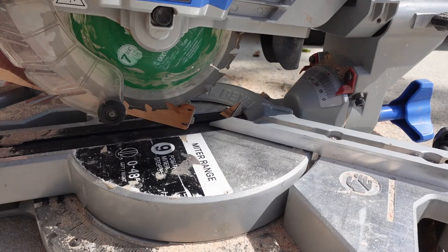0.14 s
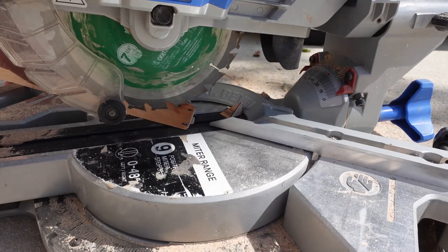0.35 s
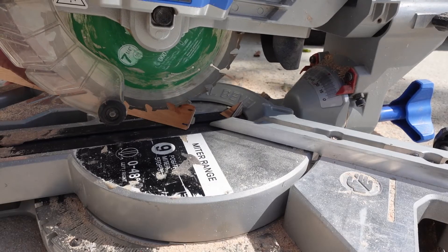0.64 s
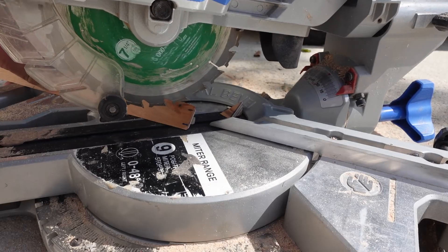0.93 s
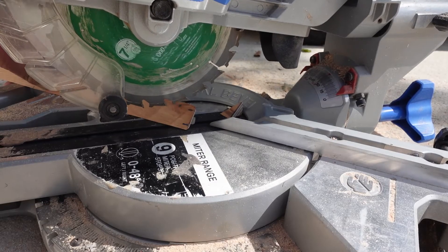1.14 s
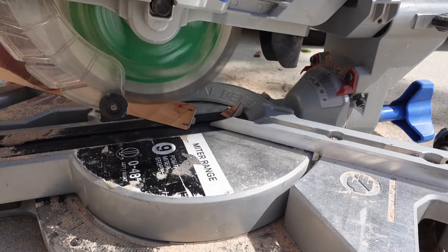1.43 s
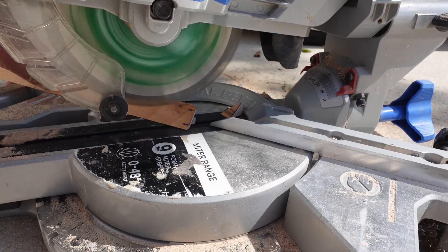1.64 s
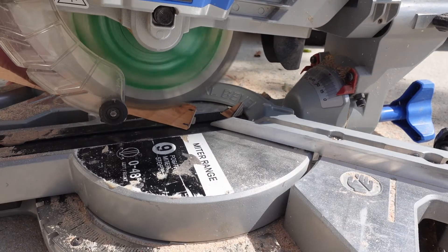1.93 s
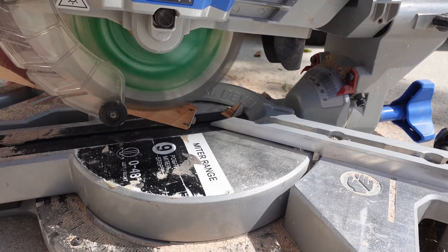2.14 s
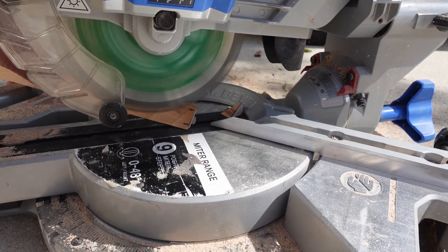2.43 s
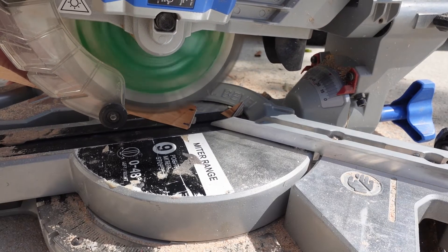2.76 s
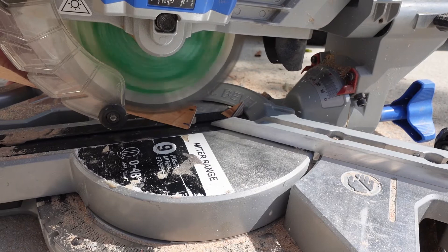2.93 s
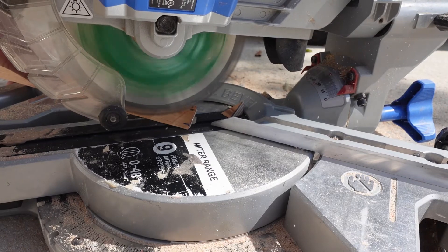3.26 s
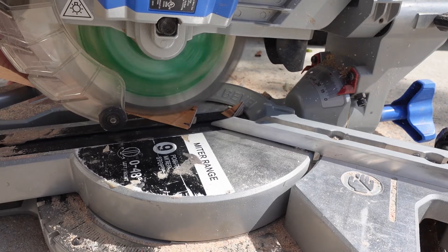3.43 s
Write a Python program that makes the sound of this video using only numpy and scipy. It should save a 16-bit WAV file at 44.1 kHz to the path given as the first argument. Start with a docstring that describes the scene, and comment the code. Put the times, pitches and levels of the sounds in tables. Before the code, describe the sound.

A cordless miter saw clicks on, whines up to speed and runs with a rough, rushing roar

```python
"""A cordless miter saw outdoors, close to a mono microphone.
First a gust buffets the microphone (puffs of deep noise) over a background hiss, a far rushing
and a far idling engine (steady tones). A finger works the trigger: short bursts of filtered noise.
The motor kicks in and whines up to speed (gliding tones, with rushing noise around them). The blade
chuffs as it turns (one puff of noise a turn), then buzzes and rings in the wood (blurred tones)."""
import sys
import numpy as np
from scipy import signal
from scipy.fft import rfft, irfft, next_fast_len
from scipy.io import wavfile
from scipy.ndimage import uniform_filter1d, map_coordinates

SR = 44100
rng = np.random.default_rng(int(sys.argv[2]) if len(sys.argv) > 2 else 0)


def generate_wav(sig):
    """Save sig (samples, or channels by samples) to the path in sys.argv[1] as 16-bit PCM at SR."""
    pcm = np.round(np.clip(np.atleast_2d(sig).T, -1, 1) * 32767).astype(np.int16)
    wavfile.write(sys.argv[1], SR, pcm)


N = 158760
T = np.arange(N) / SR  # time of each sample (s)

# Noise colours, used for their shape only: freq_hz, level_db (per Hz)
BUFFET_COLOUR = [(12, -34), (20, -6), (69, -1.5), (121, 3), (248, -11.5), (281, -12), (315, -16.5),
                 (900, -39.5), (1170, -60), (1980, -120)]  # wind pushing on the microphone
HISS_COLOUR = [(15, -41), (25, -3), (49, -5.5), (137, -13), (228, -18.5), (299, -22), (461, -24),
               (1220, -34), (1590, -32), (2590, -35), (4100, -43), (11400, -49), (15800, -56)]  # background hiss
DISTANT_COLOUR = [(500, -36), (690, 5), (800, -18), (1500, -11), (3600, -15), (4000, -42)]  # a far rushing
BRUSH_COLOUR = [(2650, -21), (4500, -3.5), (5210, -27.5), (5980, -5.5), (10400, -7.5), (15800, -22)]  # chuffs of the blade
RUSHING_COLOUR = [(60, -40), (238, -16.5), (300, -23.5), (397, -9.5), (501, -9.5), (762, -11), (962, -1.5),
                  (1080, -7.5), (1460, -10.5), (1680, -6.5), (1890, -12.5), (2030, -8.5), (2180, -8.5),
                  (2620, -10.5), (3640, -14.5), (4090, -10.5), (5280, -13.5), (5930, -11), (10400, -21.5),
                  (15800, -29)]  # gears, fan and air round the blade

# Gusts on the microphone: time_s, peak_db, fall_s (to about a third)
PUFFS = [(0.066, -39.5, 0.017), (0.126, -22.5, 0.027), (0.189, -24, 0.025), (0.256, -22.5, 0.028),
         (0.331, -40, 0.028), (0.422, -44, 0.0095), (0.491, -69, 0.0094)]
PUFF_RISE = 0.49  # rise time of a gust over its fall time
PUFF_HISS_DB = -29.5  # hiss added for a puff of gain 1; it follows the puff's square root
# Level of the background hiss, which sinks and at the end lifts a little: time_s, level_db
HISS_LEVEL = [(0, -50.5), (.3, -54), (.6, -58), (.9, -59), (1.3, -68.5), (1.5, -75.5), (3.6, -70)]
DISTANT_START_DB, DISTANT_FALL_DB_PER_S = -56, 31
MIC_HISS_DB = -78
# Far engine: multiple of the idle pitch, level_db (relative)
IDLE = [(1, -83), (2, -73), (3, -70.5), (4, -78.5), (5, -81.5), (6, -76.5), (8, -82.5), (14, -79.5)]
IDLE_HZ, IDLE_GAIN_DB = 39.6, 10.0
IDLE_SHARE = 0.64  # share of the hiss's level change, in dB, that is also heard on the engine

# Trigger clicks; the last three are the motor's kick, the gears taking up and a tick as the soft
# start ends: time_s, level_db, hold_s, t60_s, centre_hz, width_hz (of one pass of a doubled filter)
CLICKS = [(0.837, -69, 0.003, 0.033, 1900, 400), (0.878, -61.5, .003, 0.073, 1550, 600),
          (0.904, -47.5, 0.0029, 0.036, 1420, 1190), (0.957, -55.5, 0.002, 0.019, 1590, 1500),
          (1.0463, -30, 0.0029, 0.0063, 3270, 11000), (1.047, -42, 0.0023, 0.021, 450, 604),
          (1.048, -33.5, 0.0015, 0.026, 1900, 2600), (1.3163, -32, 0.0029, 0.012, 3020, 3470),
          (1.34, -36, 0.0042, 0.03, 850, 700), (1.389, -45, 0.003, 0.012, 10000, 9000)]
CLICK_RISE_S = 0.00037
KNOCK_DB, KNOCK_HZ = -19.5, 111  # low push under each click, relative to the click
# The trigger's slide: centre_hz, width_hz, level_db (relative)
CREAK_PEAKS = [(3840, 440, -4), (4640, 210, 0), (6100, 130, 1), (8100, 330, -7), (9100, 400, -12)]
CREAK_S, CREAK_HALF_LENGTH_S, CREAK_DB = .922, 0.016, -56
ECHO_DB, ECHO_T60_S, ECHO_TOP_HZ = -18, 0.11, 5000

# Speed of the saw: time_s, whine_hz
SPEED = [(1.33, 20), (1.42, 1050), (1.5, 2160), (1.55, 2730), (1.6, 3200), (1.65, 3460), (1.7, 3640),
         (1.75, 3770), (1.83, 3900), (1.95, 3980), (2.11, 4012), (2.4, 4038), (2.8, 4038), (3.6, 4026)]
ON_S, ON_FADE_S = 1.3165, 0.0028

# Bite into the wood, a gain on buzz and ring: time_s, bite_db
BITE = [(2.6, -40), (2.78, -0.5), (3.0, 5), (3.3, 6), (3.6, 4.5)]
BUZZ_PER_WHINE = 3 / 140  # Hz of buzz per Hz of whine
# Buzz of the cut: multiple of the buzz pitch, level_db (before the bite)
BUZZ = [(20, -55), (24, -60), (28, -59), (31, -59), (36, -60), (37, -58), (38, -59), (39, -61), (47, -58.5),
        (56, -60)]
# Ringing of the blade: pitch_hz, level_db (before bite or chuff)
BLADE = [(7900, -65), (8312, -62), (8856, -56), (8974, -57), (9200, -55.5), (10120, -65), (10616, -65),
         (11400, -68), (15500, -70)]
BLADE_BLUR_HZ = 260

# Chuffs: time_s, level_db (before the shape of each chuff)
CHUFF_LEVEL = [(1.6, -47), (1.75, -32), (2.3, -33), (2.4, -36.5), (2.6, -31.5), (2.85, -29.5), (3.1, -32.5),
               (3.6, -50)]
CHUFF_S = 2.7  # one strong chuff; the others are placed turn by turn around it
WHINE_PER_TURN = 70  # whine cycles per blade turn
CHUFF_RISE_S, CHUFF_T60_S = 0.0043, 0.053
CHUFF_WEAK_DB = -9.5  # every second turn is weaker
CHUFF_SCATTER_DB, CHUFF_JITTER_S = 1.5, .0015  # random spread of strength and timing
CHUFF_RING_DB = 44.5  # how hard a chuff rings the blade

# Band edges of the roar: edge_hz
BANDS = [0, 1500, 6500, 11000, 20000]
# Roar in those bands: time_s, lows_db, mids_db, treble_db, top_db (before the trim)
ROAR = [(1.33, -44, -53, -68, -67), (1.39, -40.5, -41.5, -62, -69), (1.451, -40, -39.5, -43, -59),
        (1.58, -51.5, -37.5, -40, -45), (1.681, -41, -37, -45, -52.5), (1.85, -39.5, -35.5, -45.5, -55),
        (2.3, -42, -37, -45, -57), (2.648, -41.5, -36.5, -45.5, -60), (2.8, -41, -38.5, -45, -48),
        (3.1, -44, -38, -43, -50), (3.6, -45, -37, -40, -45.5)]
ROAR_TRIM_DB = -2.5
PATCHY_DB, FLUTTER_DB, BAND_FLUTTER_DB = 1.5, .8, 1.13  # random unevenness

# The whine: time_s, whine_db, double_pitch_db, half_pitch_db
WHINE = [(1.41, -76, -58, -59), (1.428, -69, -32, -70), (1.452, -70, -42.5, -70), (1.466, -74, -31.5, -68),
         (1.484, -57, -41, -68), (1.497, -33, -44, -77), (1.515, -37, -44.5, -63), (1.55, -53.5, -46, -45),
         (1.61, -37.5, -54, -75), (1.69, -42, -71, -60), (1.79, -52, -61, -66), (1.9, -45, -79, -47.5),
         (2.1, -55.5, -68, -44), (2.5, -53.5, -74, -40.5), (2.8, -56, -65, -43.5), (3.1, -62.5, -63, -47),
         (3.6, -62, -66, -56)]
# Other shaft tones: multiple of the whine, level_db (before sag and run-up), blur_hz
ORDERS = [(.121, -59, 40), (.25, -54, 30), (.2815, -57, 10), (.418, -57, 50), (0.698, -64, 48),
          (1.458, -58, 60)]
ORDER_SAG_DB = -4  # change per unit of bite gain: the orders sink as the blade bites
ORDER_FULL_HZ = 2300  # whine speed from which the orders sound in full
RUNUP_DB, RUNUP_HZ = 7, 500  # orders are louder while the whine is this far under full speed
# Switching whistle of the soft start: rest_hz, slide (Hz per Hz of whine), level_db, start_s, end_s
WHISTLE = [(5050, .45, -46, 1.332, 1.395), (5050, -.3, -53, 1.332, 1.39), (10100, -.46, -59, 1.332, 1.49),
           (10100, .46, -63, 1.39, 1.53), (15200, -.5, -61, 1.332, 1.385)]
WHISTLE_FADE_S = .01
# The housing's hum: time_s, pitch_hz, level_db
HUM = [(1.58, 960, -53.5), (1.68, 968, -53), (2.2, 978, -40), (2.4, 970, -52.5), (2.6, 982.4, -41.5),
       (3.0, 965, -50.5), (3.6, 970, -54.5)]
# Rattles of the housing at the start: centre_hz, width_hz, level_db (relative)
HOUSING = [(850, 130, -13), (1630, 95, -8), (2270, 190, 4.5), (3420, 170, 0.5), (4000, 23, 0),
           (4470, 59, -3), (4800, 170, -5)]
# Loudness of the rattle: time_s, level_db
RATTLE_LEVEL = [(1.316, -27), (1.35, -42.5), (1.368, -32.5), (1.43, -37), (1.455, -48), (1.49, -70)]

TOP_HZ, EDGE_HZ = 15800, 150  # band limit and width of its edge


def amp(db):
    """dB to gain."""
    return 10 ** (np.asarray(db) / 20)


def unit(x):
    """Scaled to rms (average strength) 1."""
    return x / np.sqrt(np.mean(np.abs(x) ** 2) + 1e-20)


def curves(rows):
    """One value per sample for each column after the time."""
    s, *cols = np.transpose(rows)
    return [np.interp(T, s, c) for c in cols]


def wobble(rate):
    """A smooth random curve through rate random points a second."""
    return map_coordinates(rng.standard_normal(int(N * rate / SR) + 4), [T * rate])


def filtered(x, response):
    """Each frequency of x multiplied by a response, which may be complex."""
    m = next_fast_len(N + SR // 2)  # spare room so the end does not wrap onto the start
    return irfft(rfft(x, m) * response(np.fft.rfftfreq(m, 1 / SR)), m)[..., :N]


def rush(colour):
    """Coloured noise of rms 1 with patches of random gain in time and pitch."""
    z = signal.stft(rng.standard_normal(N), nperseg=512)[2]
    patches = uniform_filter1d(rng.standard_normal(z.shape), size=5, axis=0)
    patches = uniform_filter1d(patches, size=8, axis=1)
    noise = signal.istft(z * amp(PATCHY_DB * unit(patches)), nperseg=512)[1][:N]
    f, db = np.transpose(colour)

    def response(hz):
        return amp(np.interp(np.log(hz + 1), np.log(f + 1), db, left=-80, right=-80))
    return unit(filtered(noise, response))


def body(peaks):
    """The response of a set of resonances, as in a struck or shaken part."""
    def response(f):
        return sum((-1) ** k * amp(db) * 1j * f * w / (c * c - f * f + 1j * f * w)
                   for k, (c, w, db) in enumerate(peaks))
    return response


def tone(hz, blur_hz, steady):
    """A tone of rms 1 on a pitch curve: part clean, part narrow noise."""
    fuzz = (wobble(blur_hz) + 1j * wobble(blur_hz)) / np.sqrt(2)
    phase = 2 * np.pi * np.cumsum(hz + 0 * T) / SR
    return np.sqrt(2) * np.real(unit(steady + fuzz) * np.exp(1j * phase))


def outdoors():
    """Puffs of wind on the microphone, background hiss, far rushing, far engine, microphone hiss."""
    puffs = sum(amp(db) * np.exp(-((T - s) / np.where(T < s, PUFF_RISE * fall, fall)) ** 2)
                for s, db, fall in PUFFS)
    hiss_db, = curves(HISS_LEVEL)
    hiss = (amp(hiss_db) + amp(PUFF_HISS_DB) * np.sqrt(puffs)) * rush(HISS_COLOUR)
    engine = sum(amp(db + IDLE_GAIN_DB) * np.cos(2 * np.pi * k * IDLE_HZ * T) for k, db in IDLE)
    engine = engine * amp(IDLE_SHARE * (hiss_db - hiss_db[0]))
    distant = amp(DISTANT_START_DB - DISTANT_FALL_DB_PER_S * T) * rush(DISTANT_COLOUR)
    mic_hiss = amp(MIC_HISS_DB) * rng.standard_normal(N)
    return puffs * rush(BUFFET_COLOUR) + hiss + engine + distant + mic_hiss


def trigger():
    """Short cracks in the plastic with a low push, a sliding creak and a short echo."""
    creak_shape = np.exp(-((T - CREAK_S) / CREAK_HALF_LENGTH_S) ** 8)  # flat top, steep sides
    dry = amp(CREAK_DB) * creak_shape * unit(filtered(rng.standard_normal(N), body(CREAK_PEAKS)))
    for s, db, hold, t60, hz, width in CLICKS:
        fall = amp(db - 60 * np.clip(T - s - hold, 0, 1) / t60)
        shape = fall * np.clip((T - s) / CLICK_RISE_S, 0, 1)
        # The square root makes the push die away half as fast, in dB, as the crack
        push = amp(KNOCK_DB) * np.sin(2 * np.pi * KNOCK_HZ * (T - s)) * np.sqrt(shape * amp(db))
        resonance = body([(hz, width, 0)])
        crack = unit(filtered(rng.standard_normal(N), lambda f: resonance(f) ** 2))
        dry = dry + push + shape * crack
    tail = rng.standard_normal(SR // 4) * amp(-60 * T[:SR // 4] / ECHO_T60_S)
    dulled = filtered(dry, lambda f: 1 / (1 + 1j * f / ECHO_TOP_HZ))
    return dry + amp(ECHO_DB) * signal.fftconvolve(dulled, tail / np.linalg.norm(tail))[:N]


def ringing():
    """The blade's ring: high tones blurred into narrow noise."""
    return sum(amp(db) * tone(hz, BLADE_BLUR_HZ, steady=0.14) for hz, db in BLADE)


def cut(speed):
    """In the wood the drive buzzes at a pitch tied to its speed, and the blade rings."""
    buzz = sum(amp(db) * tone(k * BUZZ_PER_WHINE * speed, 25, steady=0.92) for k, db in BUZZ)
    return amp(curves(BITE)[0]) * (buzz + ringing())


def chuffs(speed):
    """A puff of treble at each turn of the blade, every second one weaker; it also rings the blade."""
    turns = np.cumsum(speed) / SR / WHINE_PER_TURN
    turns = np.floor(turns - turns[round(CHUFF_S * SR)])
    at = np.flatnonzero(np.diff(turns))  # samples where a new turn begins
    draw = rng.standard_normal((N // 200, 2))[:len(at)]
    late = np.round(SR * CHUFF_JITTER_S * draw[:, 0]).astype(int)
    kicks = np.zeros(N + SR)
    kicks[at + late] = amp(CHUFF_WEAK_DB * (turns[at + 1] % 2) + CHUFF_SCATTER_DB * draw[:, 1])
    u = T[:SR // 10]
    one_chuff = amp(-60 * u / CHUFF_T60_S) * (1 - np.exp(-u / CHUFF_RISE_S))
    shape = signal.fftconvolve(kicks, one_chuff)[:N]
    return amp(curves(CHUFF_LEVEL)[0]) * shape * (rush(BRUSH_COLOUR) + amp(CHUFF_RING_DB) * ringing())


def roar():
    """Gears, fan and air rushing round the blade: noise in bands, each with its own level."""
    noise = rush(RUSHING_COLOUR)
    shared = FLUTTER_DB * wobble(50)
    total = 0
    for db, lo, hi in zip(curves(ROAR), BANDS, BANDS[1:]):
        band = unit(filtered(noise, lambda hz: (hz >= lo) & (hz < hi)))
        total = total + amp(db + ROAR_TRIM_DB + shared + BAND_FLUTTER_DB * wobble(250)) * band
    return total


def shaft_orders(speed):
    """Tones at other multiples of the whine, louder in the run-up and weaker in the wood."""
    sag_db = ORDER_SAG_DB * amp(curves(BITE)[0])
    runup_db = RUNUP_DB * np.clip((speed.max() - speed) / RUNUP_HZ, 0, 1)
    fade_in = np.clip(speed / ORDER_FULL_HZ, 0, 1) ** 4
    tones = sum(amp(db) * tone(k * speed, blur, steady=0.72) for k, db, blur in ORDERS)
    return tones * amp(sag_db + runup_db) * fade_in


def soft_start_whistle(speed):
    """Switching tones that slide up or down as the motor gains speed."""
    total = 0
    for hz, slide, db, start, end in WHISTLE:
        gate = (T > start) * np.clip((end - T) / WHISTLE_FADE_S, 0, 1)
        total = total + amp(db) * tone(hz + slide * speed, 38.3, steady=3.0) * gate
    return total


def housing_rattle():
    """Unevenly strong noise shakes the resonances of the housing."""
    shaken = rng.standard_normal(N) * amp(1.5 * wobble(250))
    return amp(curves(RATTLE_LEVEL)[0]) * unit(filtered(shaken, body(HOUSING)))


def motor(speed):
    """The whine with its double and half, tied to the shaft, plus the motor's other sounds."""
    whine = sum(amp(db) * tone(k * speed, 30.18, steady=10.0)
                for k, db in zip((1, 2, 1 / 2), curves(WHINE)))
    hum_hz, hum_db = curves(HUM)
    hum = amp(hum_db) * tone(hum_hz, 35, steady=0.77)
    return hum + whine + shaft_orders(speed) + soft_start_whistle(speed) + housing_rattle()


def scene():
    """The saw starts with the motor's kick, over the outdoors and the trigger; both channels are alike."""
    speed, = curves(SPEED)
    on = np.clip((T - ON_S) / ON_FADE_S, 0, 1)
    saw = on * (cut(speed) + chuffs(speed) + roar() + motor(speed))
    mono = outdoors() + trigger() + saw
    return np.array([mono, mono])


def record(dry):
    """Nothing is kept above the band limit, which has a narrow sloping edge."""
    return filtered(dry, lambda hz: np.clip((TOP_HZ - hz) / EDGE_HZ + .5, 0, 1) ** 2)


dry = scene()
out = record(dry)
generate_wav(out)
```